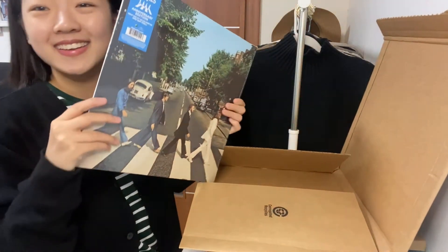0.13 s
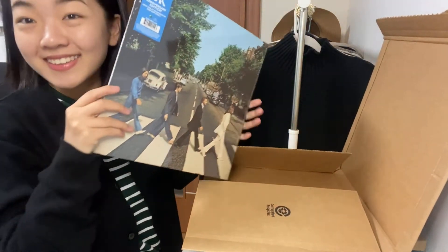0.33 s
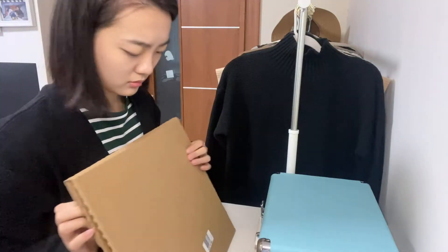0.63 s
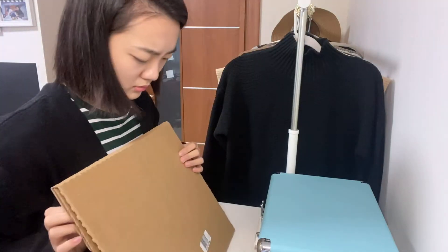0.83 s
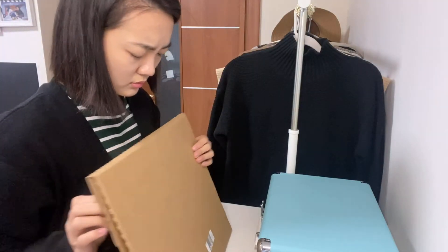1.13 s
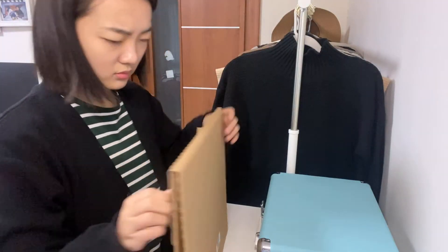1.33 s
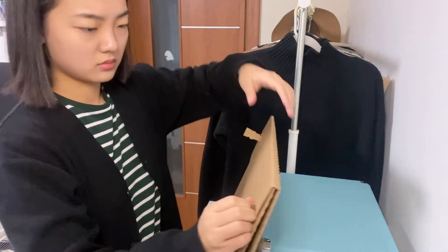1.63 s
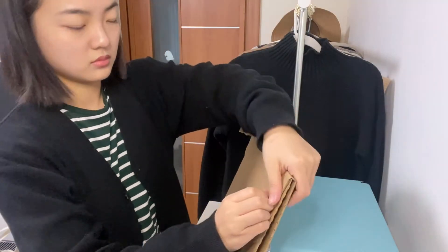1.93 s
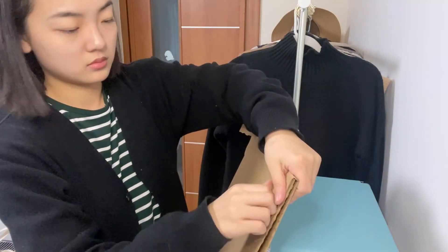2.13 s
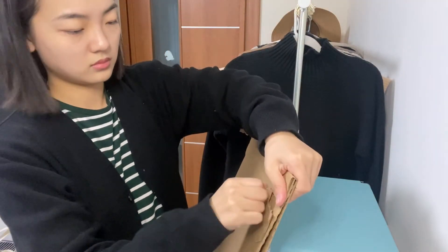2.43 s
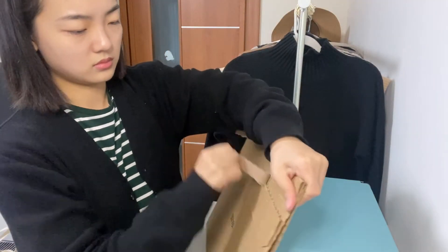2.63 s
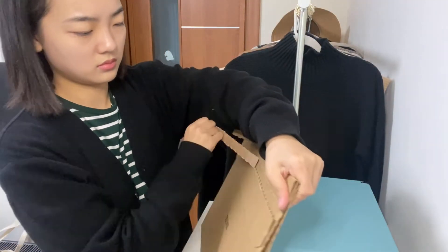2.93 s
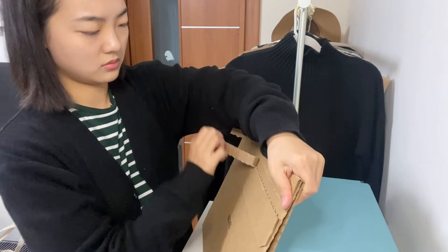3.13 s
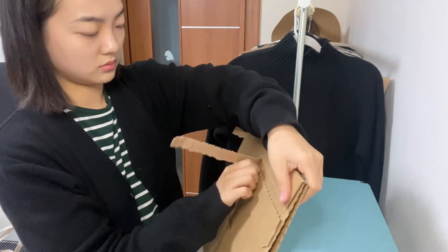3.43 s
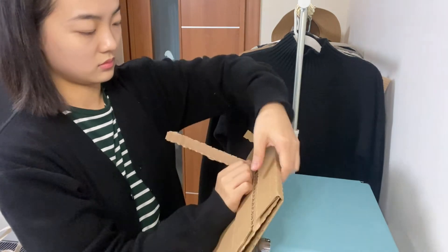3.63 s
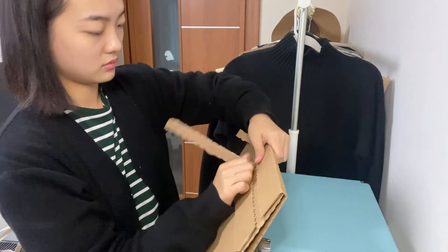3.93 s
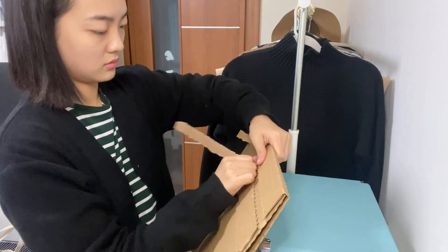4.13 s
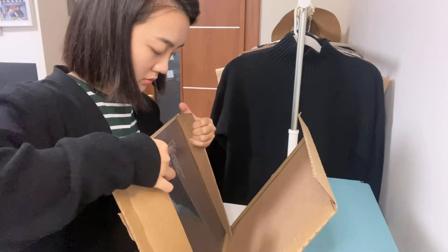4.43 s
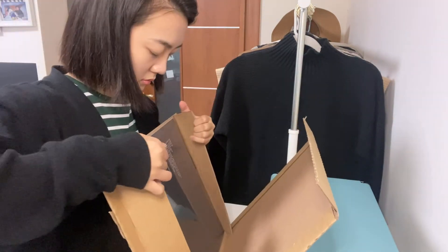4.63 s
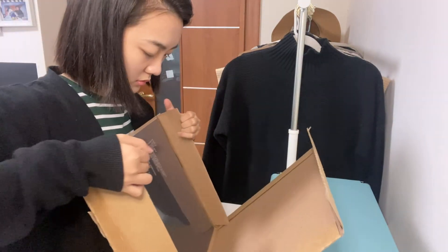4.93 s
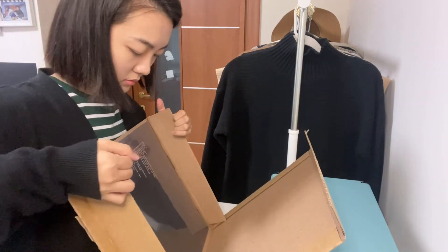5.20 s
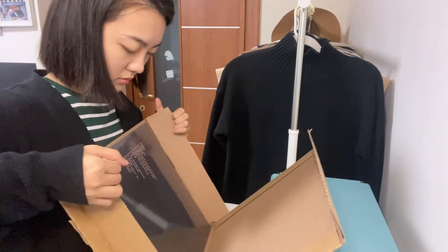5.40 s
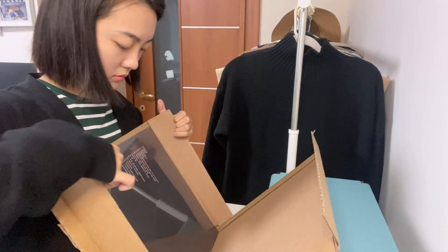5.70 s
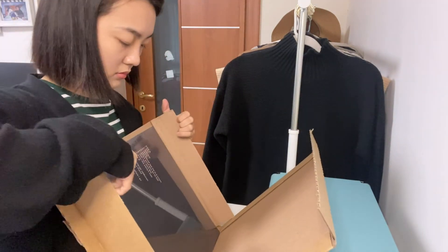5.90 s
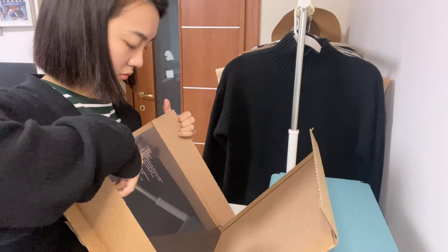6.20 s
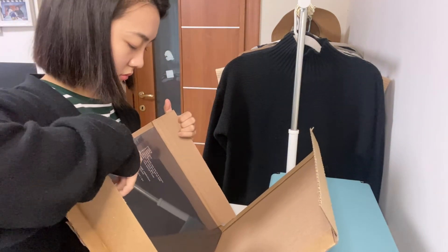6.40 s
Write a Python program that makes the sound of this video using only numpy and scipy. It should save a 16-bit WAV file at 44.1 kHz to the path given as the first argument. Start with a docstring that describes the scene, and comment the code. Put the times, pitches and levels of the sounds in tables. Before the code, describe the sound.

A sharp cardboard knock sounds right at the start, followed by brief rubbing. From about 0.5 to 2.5 seconds, fingers faintly brush and tap a flat cardboard mailer, with a short scratch near 2.4. The perforated strip rips in two quick, loud pulls at about 2.6 and 2.8 seconds, crackling fibres over low thuds from the board. Soft rustling and small ticks continue until about 4.2, when the taps grow busier and a sleeve begins dragging out of the folds. The dry scrape swells around 4.8 to 5.1 seconds. At about 5.4 the sleeve comes free with a loud snap and a thump, followed by a smaller knock at 5.5. Lighter rubs and taps fade toward the end at about 6.6 seconds. Everything is close and in stereo, in a small furnished room with little echo, faint hiss and a low table rumble.

```python
"""A table in a small furnished room: hands work on a flat cardboard mailer near a two-port microphone.
Fingers rub and tap the board, a perforated strip is ripped in two pulls, then a sleeve is dragged
out of the folds and comes free with a snap. Fracture and stick-slip friction excite the board's
heavily damped modes; panel and table boom below, and breaking fibres crackle on top."""
import sys
import numpy as np
from scipy import signal
from scipy.fft import rfft, irfft, next_fast_len
from scipy.io import wavfile
from scipy.ndimage import uniform_filter1d

SR = 44100
rng = np.random.default_rng(int(sys.argv[2]) if len(sys.argv) > 2 else 0)


def store_wav(level_fs):
    """Save 16-bit WAV to argv[1]."""
    pcm = np.round(np.clip(np.atleast_2d(level_fs), -1, 1) * 32767)
    wavfile.write(sys.argv[1], SR, pcm.T.astype(np.int16))


N = 289119

# Perforation bridges breaking; all table levels are relative: (time [s], crack [dB], thud [dB])
BRIDGES = [(2.593, -12, -44), (2.598, -18.5, -48.5), (2.6118, -4.5, -23), (2.628, -11.5, -8),
           (2.639, -7, -17), (2.651, -7.5, -5.5), (2.665, -8, -27), (2.673, -21.5, -57),
           (2.685, -26.5, -49), (2.797, -19.5, -49), (2.804, -13.5, -31), (2.824, -9.5, -17.5),
           (2.838, -9.5, -9.5), (2.8498, -13, -35), (2.864, -6.5, -0.5), (2.879, -8, -10)]
# Crack of one bridge: (frequency [Hz], spectral level [dB])
TEAR_SPECTRUM = [(880, -29.5), (1500, -6), (1830, 3.5), (2660, -4.5), (3600, -8.5), (5000, 1), (6700, 6.5),
                 (9220, 1), (12000, 6.5), (15600, -7.5), (16300, -42)]
def tearing():
    """Tensile fracture: each bridge stretches, breaks and knocks the board in step with its crack."""
    times, crack_db, thud_db = np.transpose(BRIDGES)
    pan_db = 5 * rng.standard_normal(len(times))
    events = np.c_[times, crack_db, crack_db - 21.5, crack_db - 23, crack_db - 14, thud_db, pan_db]
    return blows(events, TEAR_SPECTRUM, rise_s=0.0083, push_t60=0.00063,
                 crack_t60=0.0098, shake_t60=0.006, quicken=0.04)


# Snaps and taps: (time [s], crack [dB], low knock [dB], middle knock [dB], high knock [dB],
# thud [dB], left over right [dB])
SNAP_EVENTS = [(0.0365, 2.5, -7.5, -7.5, -14, -8, -3.5), (0.412, -50, -53.5, -43, -42.5, -62.5, -1.5),
               (1.285, -40, -54, -70, -74, -59, -3.5), (1.318, -49, -65, -62, -65, -65, 1),
               (1.337, -51, -65, -39, -43, -61.5, -11), (1.349, -31.5, -49, -52, -58, -50, 4),
               (1.4523, -48.5, -74.5, -57, -52, -39, -2), (1.9984, -73, -43.5, -56.5, -46.5, -42, -5.5),
               (2.2, -42.5, -52.5, -61.5, -62, -30, 1), (2.2195, -41, -56, -37, -48, -53, -9.5),
               (2.2409, -29, -51, -39.5, -33.5, -64, 4), (2.4065, -26.5, -45.5, -33.5, -50, -65.5, -27),
               (2.7616, -19.5, -31, -53.5, -56, -48.5, -1), (2.9328, -24, -34, -65, -59, -35.5, 3.5),
               (3.1105, -49.5, -36, -45, -38.5, -36, -11), (3.215, -39.5, -57, -74, -64, -54, 1),
               (3.3014, -47.5, -50, -57.5, -69, -43, -7), (3.449, -34.5, -57.5, -65, -71, -26, -2),
               (3.9404, -41, -60, -70, -68, -42, 5), (3.957, -60, -49, -51.5, -63, -46, -6),
               (4.141, -46.5, -79.5, -76, -75, -60, 1), (4.154, -60, -79, -72, -75, -60, -3),
               (4.18, -45, -71, -75, -75, -56, 1), (4.1949, -52, -71, -73.5, -75, -52, -0.5),
               (4.2127, -30, -56.5, -60, -55, -60.5, 5), (4.239, -46, -46, -45, -58, -62, -1),
               (4.2652, -40, -76, -62, -63, -66, 9), (4.2961, -21.5, -44, -37, -31.5, -47, -5),
               (4.3259, -28, -46.5, -35.5, -42.5, -33, 1), (4.377, -40, -58, -60, -60, -60, -1),
               (4.387, -48, -60, -52, -58, -60, -3), (4.4428, -29.5, -54, -44.5, -48.5, -48, 0.5),
               (4.4558, -18.5, -42, -44, -29.5, -41, 2.5), (4.5115, -28.5, -33.5, -39, -55.5, -46, 6),
               (4.524, -26.5, -37, -28.5, -28.5, -17, -3), (4.567, -35, -36, -35, -43, -50, -4),
               (4.5955, -44, -52.5, -59, -59, -40, -13), (4.612, -28.5, -56, -64, -64, -48, 5),
               (4.6553, -22.5, -57, -60, -60, -49, -2), (4.6665, -40, -39, -64.5, -64, -45, 16),
               (4.855, -37, -34, -23, -36.5, -42, -6.5), (4.964, -47.5, -26.5, -21, -35.5, -45, -7.5),
               (5.012, -27, -19, -34, -36.5, -48.5, 0), (5.119, -42.5, -36.5, -45.5, -36, -53, 6.5),
               (5.1673, -28, -38.5, -39.5, -43.5, -29.5, 0), (5.181, -39, -31, -32.5, -48.5, -43.5, 4.5),
               (5.218, -41, -37, -55, -64, -48.5, 12), (5.258, -35.5, -25.5, -36, -45, -35, -0.5),
               (5.3067, -33, -32, -42.5, -44.5, -40, 1), (5.3303, -38, -31, -41.5, -38.5, -47, -10),
               (5.3665, 0.5, -6, -15, -10, -17, -4), (5.4931, -8, -23, -18, -16.5, -5.5, 2.5),
               (5.5145, -27, -36.5, -32, -21, -10, -6.5), (5.5545, -36.5, -25, -28.5, -31, -40.5, -2),
               (5.7015, -58.5, -40, -41, -40.5, -20.5, -3), (5.7841, -34, -40, -36, -37.5, -63.5, 0.5),
               (5.8115, -36.5, -35.5, -37.5, -39, -38, -2), (5.877, -31.5, -33.5, -38, -40.5, -47, -4),
               (5.8914, -41.5, -60, -62, -56, -53, 30), (6.1714, -74, -59, -50, -65, -60, -6),
               (6.2623, -41.5, -45.5, -43, -45.5, -54.5, -2.5), (6.4886, -30, -63.5, -42, -31.5, -50, -2)]
def snapping():
    """Impulsive excitation: taps and sudden releases load the board within milliseconds."""
    return blows(SNAP_EVENTS, FIBRE_SPECTRUM, rise_s=0.0016, push_t60=0.0015,
                 crack_t60=0.028, shake_t60=0.015, quicken=0.49)


# Board modes in three groups: (frequency [Hz], level [dB], t60 [s])
LOW_MODES = [(349.4, -5.5, 0.043), (376.6, -4, 0.048), (467, -5, 0.046), (542.5, -2.5, 0.029),
             (663, 1, 0.019), (769, 0.5, 0.031), (892, -1, 0.026), (993, 2, 0.021), (1047.6, -1, 0.034),
             (1207, -11.5, 0.038)]
MID_MODES = [(1312, -3, 0.0077), (1480, -1, 0.01), (1606, -0.5, 0.011), (1830, 0, 0.0048)]
HIGH_MODES = [(2184, -5, 0.013), (2520, -2.5, 0.0056), (2840, -4.5, 0.0073), (3370, -4.5, 0.005),
              (4250, -3, 0.0026), (5100, -8, 0.003)]
def blows(events, spectrum, rise_s, push_t60, crack_t60, shake_t60, quicken):
    """Impact response: fibres crack and modes ring. Returns that sound and the push on the panel."""
    times, crack_db, low_db, mid_db, high_db, thud_db, pan_db = np.transpose(events)
    crack_t60 = crack_t60 * from_db(quicken * (-36 - crack_db))   # a louder crack is shorter
    fibres = rng.standard_normal(N) + 0.77 * rms_one(grains(5100, spread_db=-2))
    sound = bursts(times, crack_db - 5.5, rise_s, crack_t60, pan_db) * coloured(fibres, spectrum)
    sharp = signal.butter(2, 820, "high", fs=SR)   # a sharp blow shakes the lowest modes little
    for level_db, t60, modes in [(low_db - 23.5, shake_t60, LOW_MODES),
                                 (mid_db - 17.5, 0.77 * shake_t60, MID_MODES),
                                 (high_db - 15.5, 0.78 * shake_t60, HIGH_MODES)]:
        shake = bursts(times, level_db, rise_s, t60, pan_db) * rng.standard_normal(N)
        contact = 2.38 * bursts(times, level_db, 3 / SR, 0.00053, pan_db)   # hard and one-sided
        sound = sound + ring(signal.lfilter(*sharp, shake + contact), modes)
    return sound, bursts(times, thud_db - 42, rise_s, push_t60)[0]


# Soft bumps: (time [s], push [dB], contact t60 [s], knock [dB])
SOFT_BUMPS = [(0.436, -50, 0.028, -59), (0.513, -19.5, 0.0028, -54.5), (2.003, -45, 0.01, -53),
              (2.644, -27, 0.0069, -28), (2.865, -31, 0.0022, -26), (3.435, -23, 0.0043, -42),
              (3.607, -32, 0.016, -73), (4.748, -22.5, 0.0037, -40.5), (5.366, -0.5, 0.011, -38),
              (5.387, -15, 0.0039, -39), (5.516, -33.5, 0.0097, -40), (5.704, -41.5, 0.012, -33),
              (6.164, -52, 0.0034, -41)]
def bumping():
    """Compliant impact: a soft contact drives mainly low modes. Returns knocks and panel push."""
    times, push_db, contact_t60, knock_db = np.transpose(SOFT_BUMPS)
    dull_noise = signal.lfilter(*signal.butter(2, 461.2, fs=SR), rng.standard_normal(N))
    force = bursts(times, knock_db - 7.5, 0.017, contact_t60) * dull_noise
    return ring(force, LOW_MODES), bursts(times, push_db - 38.5, 0.003, contact_t60)[0]


# Finger rubs: (start [s], end [s], rustle [dB], low drag [dB], high drag [dB], boom [dB], change [dB])
FINGER_STROKES = [(0.0, -0.002, -37, -38, -33.5, -54, -1.5), (0.043, 0.085, -40.5, -42, -43.5, -49.5, -8),
                  (0.087, 0.236, -54, -49.5, -55, -47, -1), (0.297, 0.464, -61.5, -65.5, -60, -62, -5.5),
                  (0.472, 0.68, -63, -69, -63, -80, -7.5), (1.029, 1.13, -72.5, -84, -73.5, -78, 11),
                  (1.15, 1.226, -59, -57, -63.5, -68, -9), (1.234, 1.305, -55.5, -68, -63, -58.5, -4),
                  (1.362, 1.374, -50.5, -54, -55.5, -55, -2), (1.445, 1.535, -68.5, -81, -83.5, -89, 0),
                  (1.639, 1.902, -65.5, -73.5, -67.5, -71, 4), (1.916, 1.951, -50.5, -64.5, -79, -61, -4),
                  (1.991, 2.055, -61.5, -68, -65.5, -55, -5.5), (2.055, 2.087, -60, -59, -59.5, -64, 5),
                  (2.155, 2.153, -66.5, -60.5, -69.5, -76, 7), (2.216, 2.28, -54.5, -56, -57, -73, 2.5),
                  (2.289, 2.37, -50.5, -54, -76, -53, -8.5), (2.412, 2.423, -29, -43.5, -53.5, -47.5, -2.5),
                  (2.439, 2.57, -45, -64, -60, -52.5, -17.5), (3.044, 3.125, -60, -68.5, -93, -64.5, 2.5),
                  (3.179, 3.356, -61.5, -77, -97, -61.5, -5), (3.436, 3.581, -53.5, -61.5, -61, -64.5, 6),
                  (3.593, 3.66, -47, -77.5, -63.5, -82, 2), (3.671, 3.887, -49, -64.5, -58.5, -106, -6.5),
                  (3.92, 4.1, -55.5, -63, -68, -60.5, -2), (4.149, 4.235, -63.5, -86, -91, -83, 10.5),
                  (5.136, 5.173, -51, -39.5, -48, -62, 7), (5.242, 5.37, -55.5, -53, -55.5, -54, 3.5),
                  (5.39, 5.512, -41, -40.5, -48, -43, -9), (5.524, 5.7, -48, -39, -50.5, -38.5, -17),
                  (5.697, 5.746, -50, -49.5, -53, -36, -13), (5.778, 5.867, -54.5, -49.5, -64, -50.5, -4),
                  (5.865, 6.078, -56, -53, -57, -49.5, -10), (6.149, 6.218, -64, -59, -66, -52, 0.5),
                  (6.275, 6.43, -67, -59.5, -70, -56.5, -6.5), (6.496, 6.57, -61, -62, -79.5, -49, 0.5)]
# Two strip pulls and the sleeve's slide: (time [s], rustle [dB], low drag [dB], high drag [dB], boom [dB])
STRIP_PULLS = [
    [(2.585, -48, -60.5, -64.5, -64.5), (2.595, -24.5, -50.5, -55.5, -64), (2.637, -35.5, -23.5, -32, -30),
     (2.655, -21, -35, -25, -19), (2.683, -33, -50.5, -44.5, -42), (2.74, -46.5, -77.5, -60.5, -81)],
    [(2.76, -44.5, -60, -55, -56.5), (2.784, -43.5, -66, -58.5, -79), (2.826, -26.5, -34, -38, -30),
     (2.884, -30.5, -26.5, -27.5, -30), (2.906, -39, -45.5, -50.5, -33.5), (3.04, -66, -102.5, -71, -97)],
]
SLEEVE_SLIDE = [(4.23, -83, -49, -54, -53.5), (4.29, -52, -57.5, -58, -56),
                (4.412, -56.5, -44.5, -51.5, -53), (4.536, -53.5, -47.5, -48, -45),
                (4.684, -48, -38, -43.5, -48.5), (4.78, -48.5, -36, -40, -38),
                (4.862, -40.5, -33, -34, -43.5), (4.932, -45, -30, -35.5, -41),
                (5.028, -42, -34.5, -36.5, -44.5), (5.11, -59.5, -48.5, -55, -49)]
RISE_DB_PER_S, FALL_DB_PER_S = 905.5, 346.5
def hand_work():
    """Upper envelope: the loudest gesture sets each level of rustle, low drag, high drag and boom."""
    t = np.arange(0, N / SR, .002)
    strokes = [[(start, *levels), (end, *np.add(levels, change_db))]
               for start, end, *levels, change_db in FINGER_STROKES]
    loudest_db = np.full((4, len(t)), -150.)
    for gesture in [*strokes, *STRIP_PULLS, SLEEVE_SLIDE]:
        times, *levels = np.transpose(gesture)
        fade_db = RISE_DB_PER_S * np.maximum(times[0] - t, 0)
        fade_db += FALL_DB_PER_S * np.maximum(t - times[-1], 0)
        loudest_db = np.maximum(loudest_db, [np.interp(t, times, level) - fade_db for level in levels])
    return in_time(np.c_[t, loudest_db.T])


def drag(level_db, modes, soft_hz):
    """Stick-slip friction along the corrugation drives board modes through a soft contact."""
    slips = rms_one(grains(500 * from_db(4 * drift(30)), spread_db=4))
    force = signal.lfilter(*signal.butter(1, soft_hz, fs=SR), slips + 2.1 * rng.standard_normal(N))
    return from_db(level_db + 1.5 * drift(25)) * rms_one(ring(force, modes, grip_db=2.2))


# Paper fibres: (frequency [Hz], spectral level [dB])
FIBRE_SPECTRUM = [(300, -41), (1200, -1), (3000, -0.5), (4000, 0), (5500, 0), (7000, 3), (9200, 2.5),
                  (11500, 1.5), (13500, 1.5), (15600, -0.5), (16500, -39.5)]
def rustle(level_db):
    """Friction noise: fibres catch and let go in clumps of clicks over a smooth brushing."""
    crackle = rms_one(grains(2500 * from_db(5 * drift(28)), spread_db=2.5))
    envelope = from_db(level_db + 1.5 * drift(5.7))
    return envelope * coloured(0.6 * crackle + rng.standard_normal(N), FIBRE_SPECTRUM)


# Whole-panel and table modes: (frequency [Hz], level [dB], t60 [s])
PANEL_MODES = [(71.3, -15.5, 0.19), (99, -7.5, 0.063), (121, -3.5, 0.029), (184.5, -0.5, 0.08),
               (201.4, -3, .08), (233, -9, 0.12), (273, -7, 0.059), (300.3, -3.5, 0.015)]
def panel_boom(push, flex_db):
    """Forced vibration: pushes make the panel thud, and uneven hand pressure keeps it booming."""
    envelope = from_db(flex_db + drift(22))
    flexing = rms_one(ring(grains(300, spread_db=1), PANEL_MODES[2:]))
    return ring(push, PANEL_MODES) + envelope * flexing


# Left port's lead in the middle stretch, outside it, and its spread: (frequency [Hz], phase [rad])
MIDDLE_LEAD = [(0, 0), (1030, -1.1), (1290, -2.5), (1980, -0.2), (2240, 3.2), (2760, 3.8), (6980, 0.1),
               (8010, -3.9), (9730, -2.7), (11300, -0.3), (12900, 0.4), (14000, 3.2), (15800, 3.2),
               (16500, 2.4)]
OUTER_LEAD = [(0, 0), (120, -.2), (200, -.5), (300, -1.3), (420, -2.4), (650, -3.7), (900, -5.8),
              (2500, -6.9), (4000, -7.2), (7000, -5), (8000, -4.1), (8600, -3.2), (9800, -3), (10900, -.5),
              (11500, 0), (12600, .1), (13600, 3.1), (16500, 3.1)]
LEAD_SPREAD = [(100, .2), (200, .4), (300, 1.3), (700, 1.4), (1200, 1.1), (2500, 1.1), (4000, 1.4),
               (7000, 1.4), (8400, .4), (16000, .35)]
MIDDLE_FROM_S, MIDDLE_TO_S = 0.454, 4.224   # the stereo image changes at these two times
HOLD_S = 0.055   # time the mailer keeps one attitude
def ports(x, scatter_ms, lead_band_hz, middle_spread):
    """Scattering: nearby surfaces delay each band; the lead between ports shifts as the mailer turns."""
    size = next_fast_len(N + 4096)
    hz, t, out = np.fft.rfftfreq(size, 1 / SR), np.arange(N) / SR, 0
    attitude = rng.integers(0, 4, round(N / SR / HOLD_S) + 1)[(t / HOLD_S).astype(int)]
    attitude += 4 * ((t < MIDDLE_FROM_S) | (t > MIDDLE_TO_S))   # 0-3 in the middle stretch, else 4-7
    for k, (smear, turn) in enumerate(zip(rng.random((8, 80)), rng.standard_normal((8, 600)))):
        crossfade = np.sqrt(np.clip(uniform_filter1d((attitude == k) * 1., size=2000), 0, 1))
        delay_s = np.interp(hz / 300, np.arange(80), smear) * scatter_ms / 1000   # 300 Hz bands
        mean_lead, spread = (MIDDLE_LEAD, middle_spread) if k < 4 else (OUTER_LEAD, 0.75)
        wander = np.interp(hz, *np.transpose(LEAD_SPREAD))
        wander *= np.interp(hz / lead_band_hz, np.arange(600), turn)
        lead = np.interp(hz, *np.transpose(mean_lead)) + spread * wander
        phase = lead * [[.5], [-.5]] - 2 * np.pi * np.cumsum(delay_s) * hz[1]
        out = out + irfft(rfft(x * crossfade, size) * np.exp(1j * phase), size)
    return out[:, :N]


def room(x, t60=0.17, wall_cut_hz=8800):
    """Reverberation: a diffuse tail builds up, decays exponentially and is dulled by the walls."""
    t = np.arange(SR // 2) / SR
    tail = rng.standard_normal(len(t)) * from_db(-60 * t / t60) * np.clip(t / 0.0014, 0, 1)
    tail = signal.lfilter(*signal.butter(1, wall_cut_hz, fs=SR), tail)
    return signal.fftconvolve(x, rms_one(tail) / np.sqrt(len(t)))[:N]


# Table rumble: (frequency [Hz], spectral level [dB]) and (time [s], level [dB])
RUMBLE_SPECTRUM = [(12, -66.5), (20, -24), (55, -2.5), (65, 0.5), (85, 0), (124, -5), (188, -21.5),
                   (260, -27), (340, -43), (570, -120)]
RUMBLE_LEVELS = [(0.0, -53), (0.09, -51.5), (0.29, -56.5), (1.04, -63), (1.27, -52.5), (1.46, -58.5),
                 (1.71, -61.5), (1.81, -51), (1.95, -60.5), (2.17, -62.5), (2.33, -56.5), (2.68, -59),
                 (2.85, -51), (2.99, -49), (3.19, -55.5), (3.34, -62), (3.59, -47.5), (3.72, -61),
                 (4.01, -60.5), (4.98, -49), (5.42, -53), (5.98, -55), (6.35, -52.5), (6.55, -53)]
def table_rumble():
    """Structure-borne noise: a deep, wavering rumble, nearly coherent at the two ports."""
    level_db, = in_time(RUMBLE_LEVELS)
    mid, side = coloured(rng.standard_normal((2, N)), RUMBLE_SPECTRUM)
    return from_db(level_db + 2.5 * drift(6)) * (mid + from_db(-12) * side * [[1], [-1]])


# Room hiss: (frequency [Hz], spectral level [dB]), and its overall level
AIR, AIR_DB = [(150, -32.5), (250, -9), (728, -19), (5470, -27), (8630, -24), (9250, -28),
               (16500, -22)], -75.5
def room_hiss():
    """Stationary noise: the floor of a quiet room."""
    return from_db(AIR_DB) * coloured(rng.standard_normal(N), AIR)


def ring(force, modes, grip_db=0):
    """Modal superposition: damped resonators of alternating sign, weighted by a shifting grip."""
    out, force = 0, force + 1e-18
    grip = from_db(grip_db * drift(12)) if grip_db else None
    for k, (hz, level_db, t60) in enumerate(modes):
        radius, angle = from_db(-60 / (t60 * SR)), 2 * np.pi * hz / SR
        drive = force * np.roll(grip, k * N // len(modes)) if grip_db else force
        gain = (-1) ** k * from_db(level_db) * np.sin(angle)
        out = out + signal.lfilter([0, gain], [1, -2 * radius * np.cos(angle), radius ** 2], drive)
    return out


def bursts(times, levels_db, rise_s, t60s, pans_db=0):
    """Exponential growth and decay: a stereo envelope spanning 60 dB for each event."""
    out, rise = np.zeros((2, N + SR)), max(round(rise_s * SR), 1)
    events = np.broadcast(times, levels_db, np.clip(t60s, .0003, .3), np.clip(pans_db, -8, 8))
    for time, level_db, t60, pan_db in events:
        shape_db = np.r_[np.linspace(-60, 0, rise), np.linspace(0, -60, round(t60 * SR))]
        sides_db = np.array([[pan_db / 2], [-pan_db / 2]])
        start = round(time * SR) - rise * 5 // 6
        out[:, start:start + len(shape_db)] += from_db(level_db + shape_db + sides_db)
    return out[:, :N]


def grains(per_s, spread_db):
    """Poisson process: clicks of uneven size and sign."""
    sizes = from_db(spread_db * np.minimum(rng.exponential(1, N), 5)) * rng.choice([-1, 1], N)
    return sizes * (rng.random(N) < per_s / SR)


def drift(corner_hz):
    """Random modulation: noise through a double one-pole low-pass, rms 1."""
    pole = np.exp(-2 * np.pi * corner_hz * 20 / SR)   # one step per 20 samples
    slow = signal.lfilter([1], [1, -2 * pole, pole ** 2], rng.standard_normal(N // 20 + 4002))[4000:]
    return np.interp(np.arange(N) / 20, np.arange(len(slow)), rms_one(slow))


def coloured(x, spectrum):
    """Spectral shaping over log frequency, rms 1."""
    hz, db = np.transpose(spectrum)
    size = next_fast_len(N)
    gain = from_db(np.interp(np.log(np.fft.rfftfreq(size, 1 / SR) + 1), np.log(hz), db))
    return rms_one(irfft(rfft(x, size) * gain, size)[..., :N])


def in_time(rows):
    """Linear interpolation of each column to one value per sample."""
    times, *columns = np.transpose(rows)
    return [np.interp(np.arange(N) / SR, times, column) for column in columns]


def from_db(db):
    """Amplitude ratio of a level."""
    return 10 ** (np.asarray(db) / 20)


def rms_one(x):
    """Normalisation to rms 1."""
    return x / np.sqrt(np.mean(x ** 2) + 1e-20)


def panned(x, left_db):
    """Level difference of the left port against the right."""
    return x * from_db([[left_db], [0]])


def scene():
    """Superposition: each part of the mailer sounds from its own place and scatters in its own way."""
    rustle_db, low_db, high_db, flex_db = hand_work()
    snaps, snap_push = snapping()
    rips, rip_push = tearing()
    knocks, bump_push = bumping()
    impacts = snaps + rips + knocks
    boom = panel_boom(snap_push + rip_push + bump_push, flex_db)
    fibres = panned(rustle(rustle_db), -1.5)
    rubbing = panned(drag(low_db, LOW_MODES, soft_hz=2930), -6.5)
    rubbing += panned(drag(high_db, MID_MODES + HIGH_MODES, soft_hz=2610), -2.5)
    rumble, hiss = table_rumble(), room_hiss()
    tail = from_db(-8) * room((impacts + fibres + rubbing).mean(axis=0) + 0.79 * boom)
    near = ports(impacts, scatter_ms=0.8, lead_band_hz=300, middle_spread=1)
    # Sound from many places changes its lead within narrower bands.
    near += ports(fibres + hiss + tail, scatter_ms=2.2, lead_band_hz=40, middle_spread=1.9)
    near += ports(rubbing + panned(boom, -2.5), scatter_ms=1.6, lead_band_hz=80, middle_spread=1.9)
    return near + rumble


# The level dips briefly: (time [s], half width [s], gain [dB])
LEVEL_DIPS = [(0.455, 0.0023, -38), (4.224, 0.0015, -50.5)]
def record(dry):
    """Band limiting and soft saturation: bass and treble fall off, peaks round, the level dips twice."""
    wet = signal.sosfilt(signal.butter(1, 14800, fs=SR, output="sos"), dry)
    wet = signal.sosfilt(signal.butter(4, 42, "high", fs=SR, output="sos"), wet)
    wet = .9 * np.tanh(wet / .9)
    t = np.arange(N) / SR
    wet *= from_db(sum(db * np.exp(-((t - time) / width) ** 2) for time, width, db in LEVEL_DIPS))
    return signal.sosfilt(signal.cheby2(12, 70, 17000, fs=SR, output="sos"), wet)


dry = scene()
out = record(dry)
store_wav(out)
```